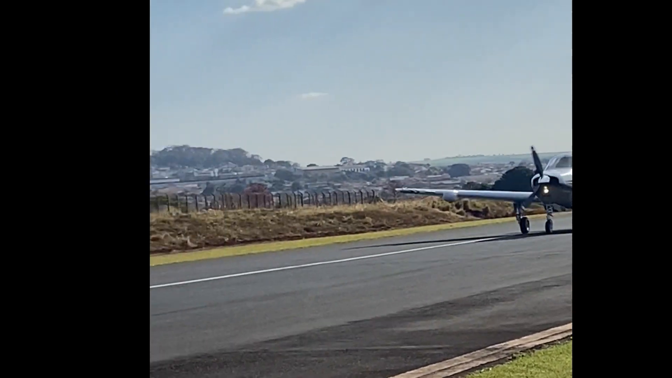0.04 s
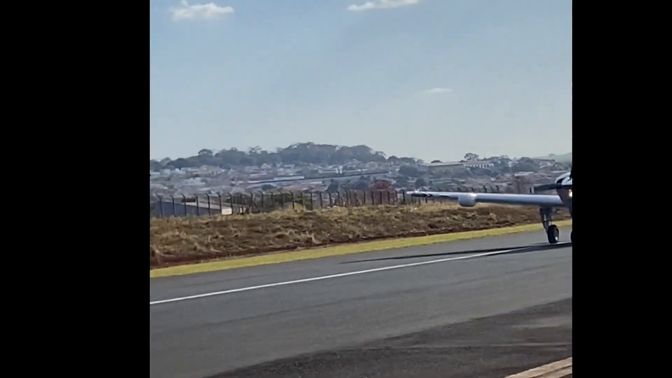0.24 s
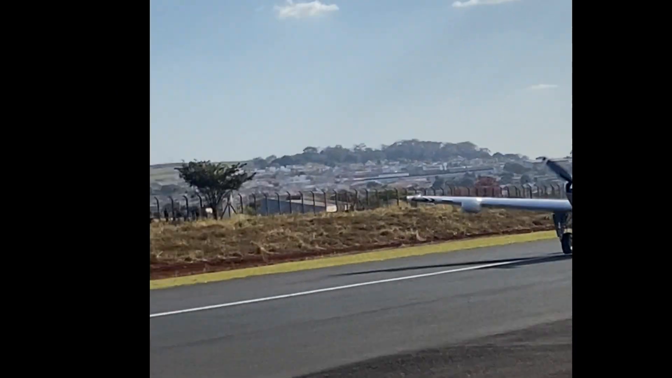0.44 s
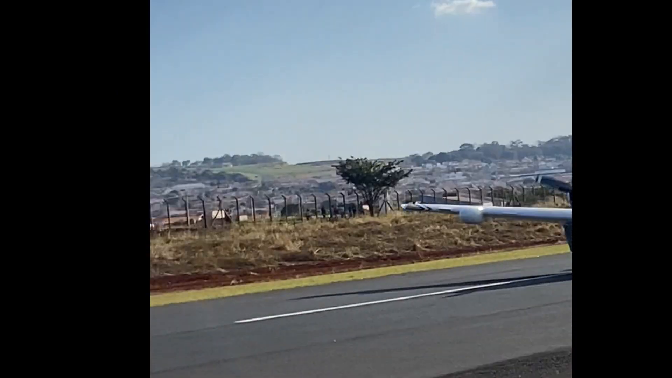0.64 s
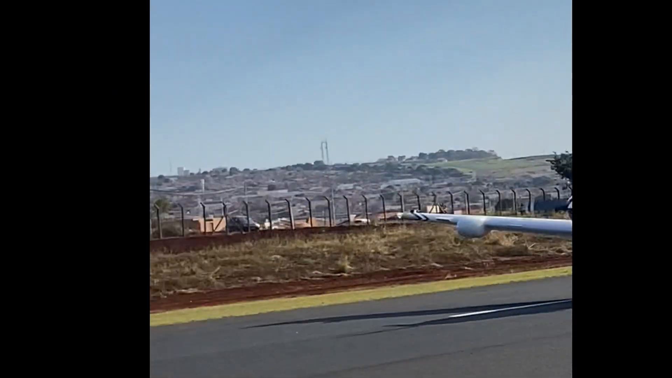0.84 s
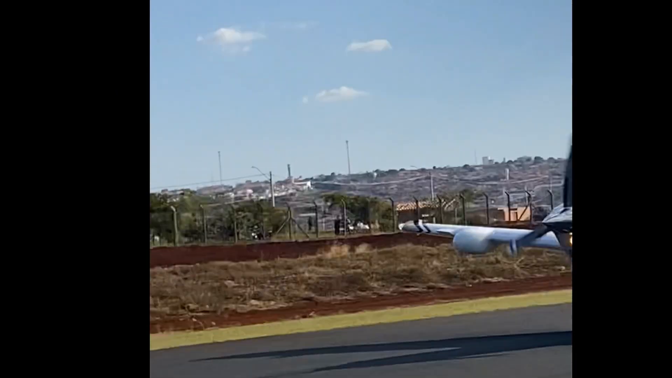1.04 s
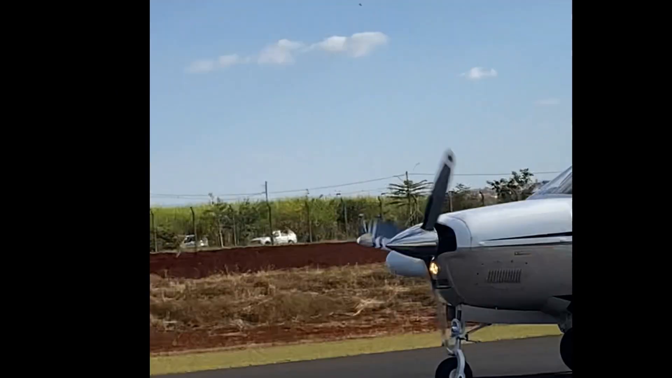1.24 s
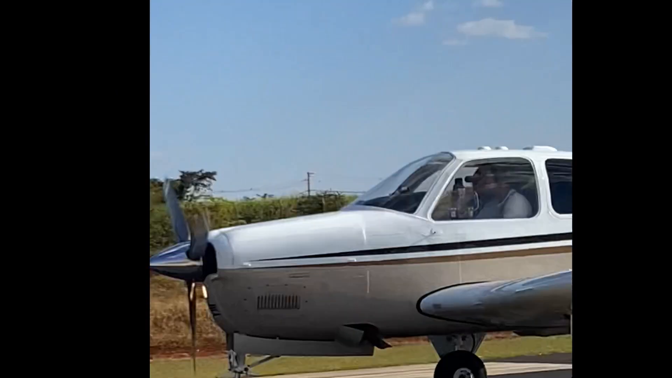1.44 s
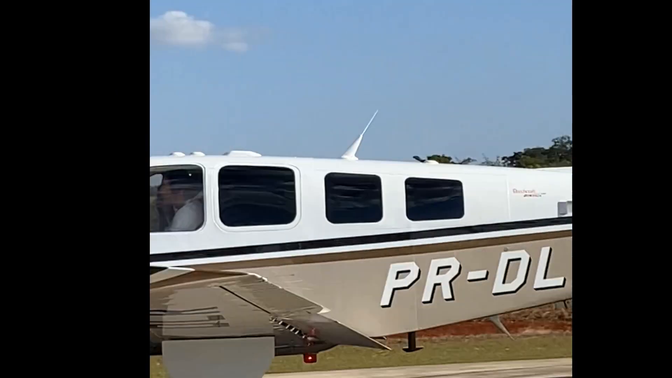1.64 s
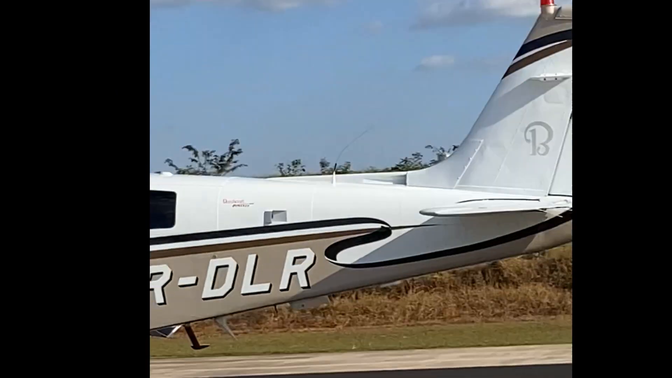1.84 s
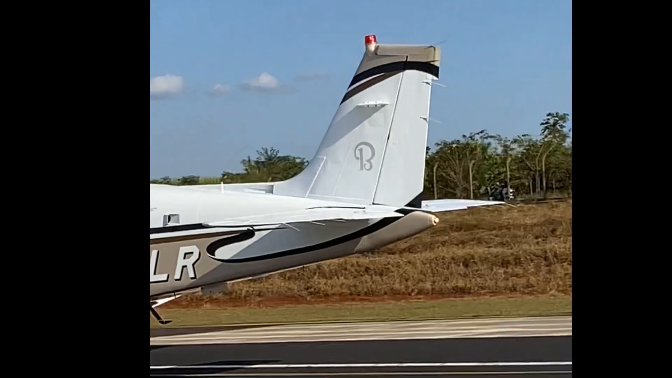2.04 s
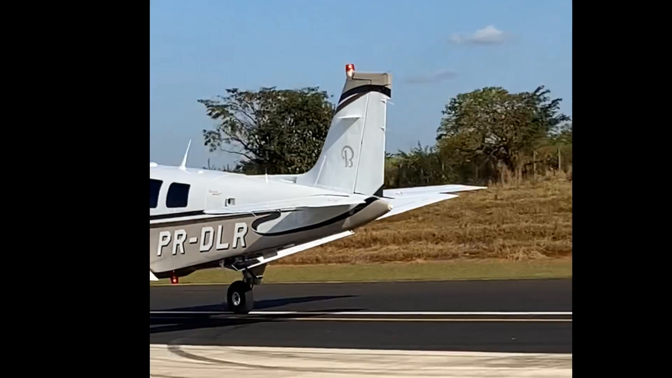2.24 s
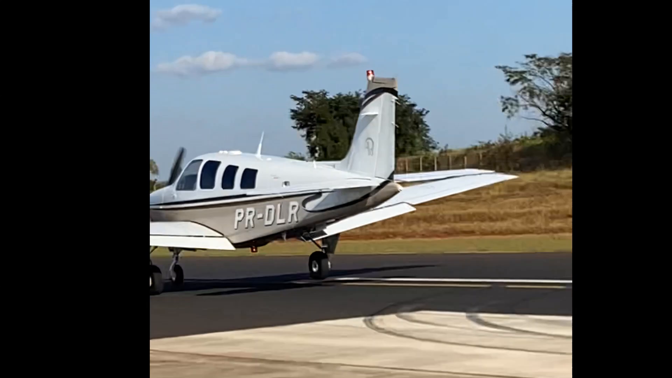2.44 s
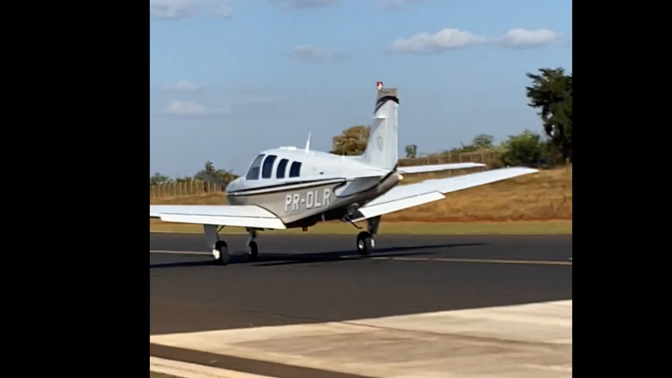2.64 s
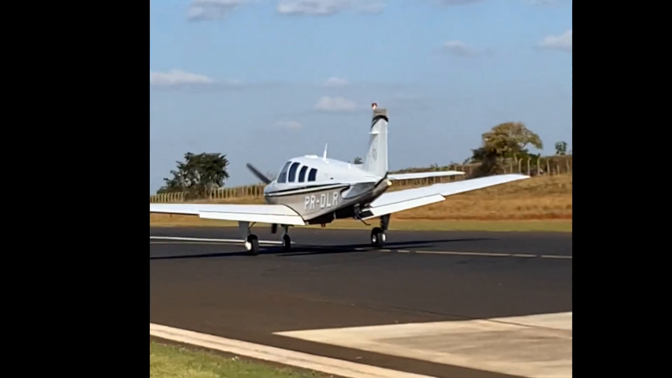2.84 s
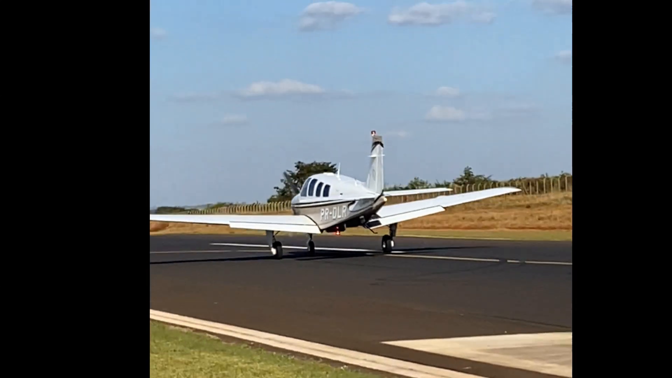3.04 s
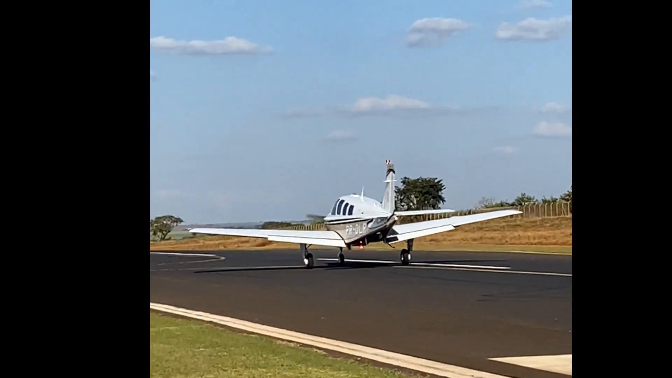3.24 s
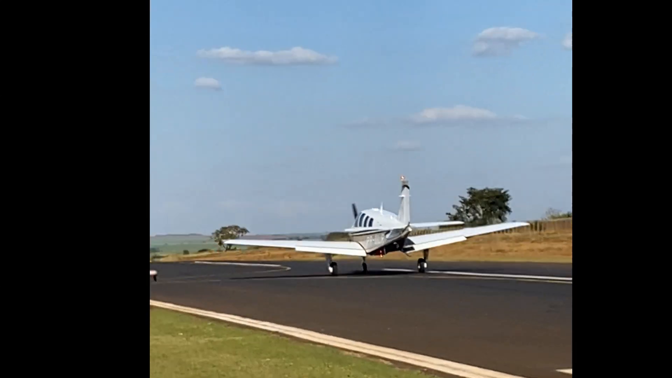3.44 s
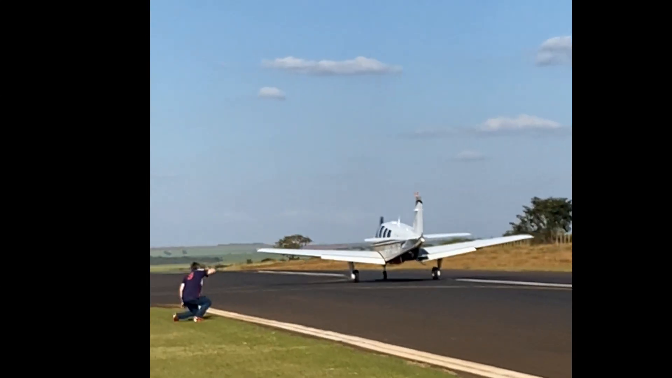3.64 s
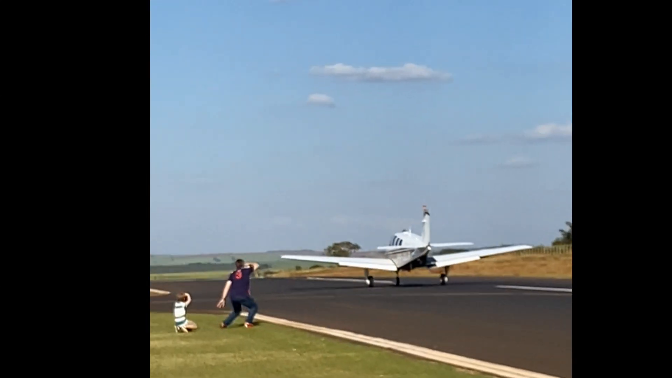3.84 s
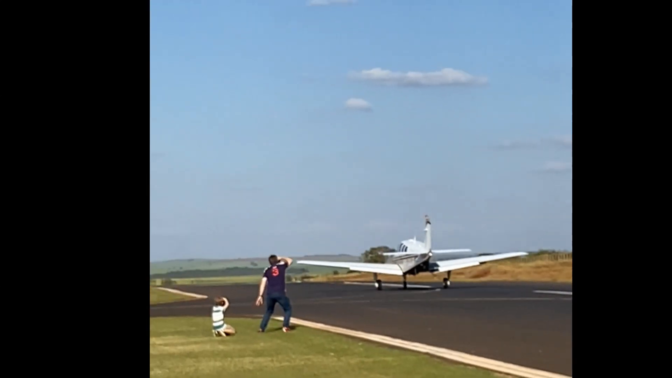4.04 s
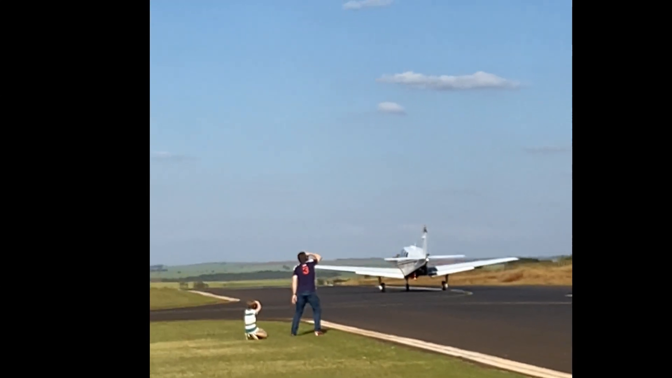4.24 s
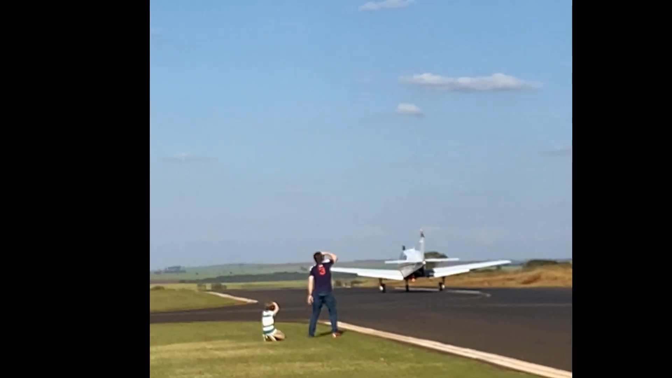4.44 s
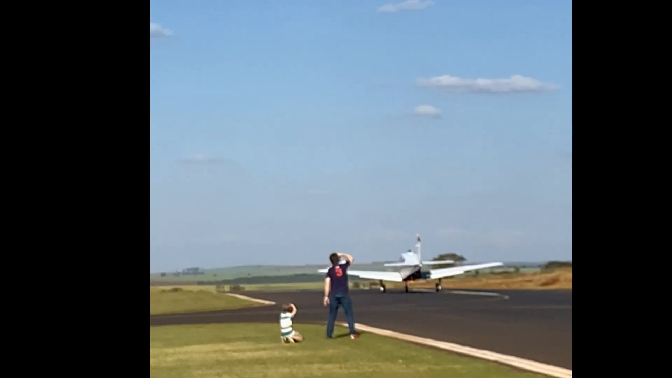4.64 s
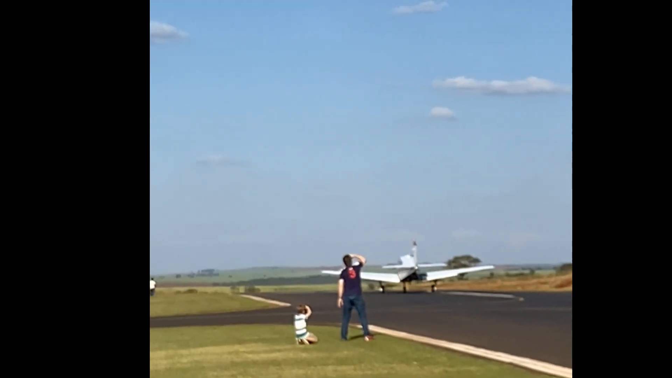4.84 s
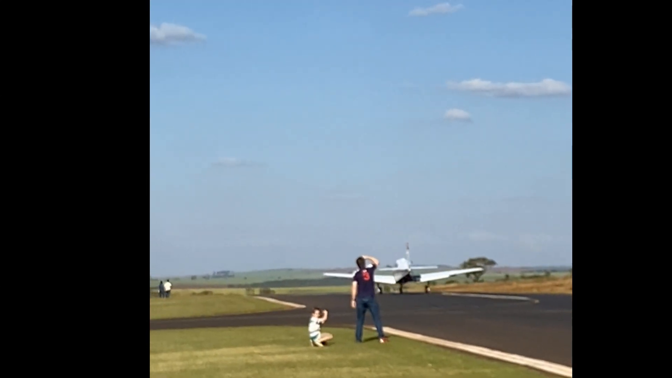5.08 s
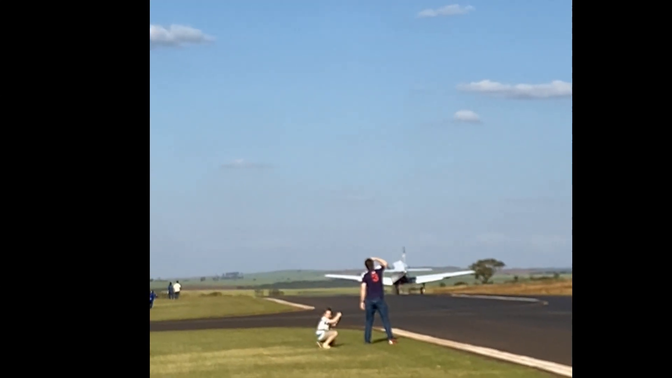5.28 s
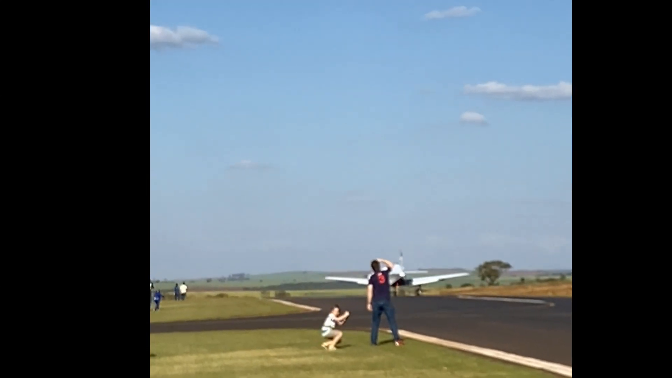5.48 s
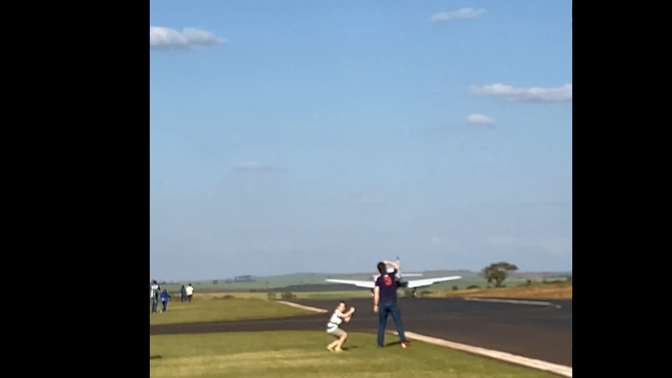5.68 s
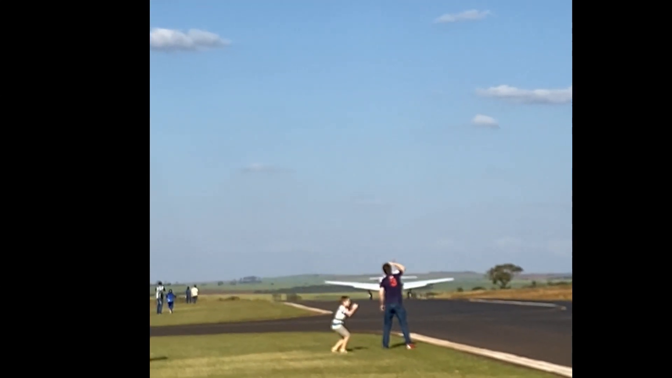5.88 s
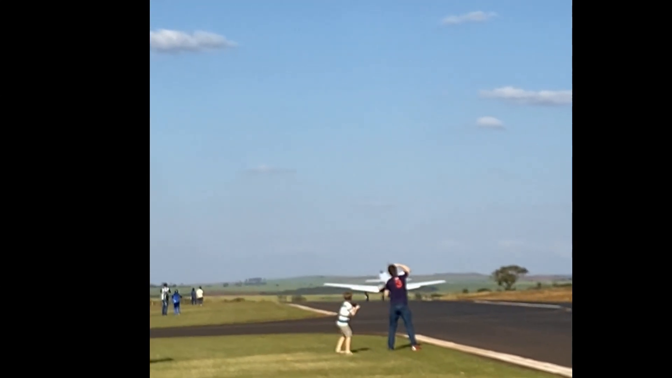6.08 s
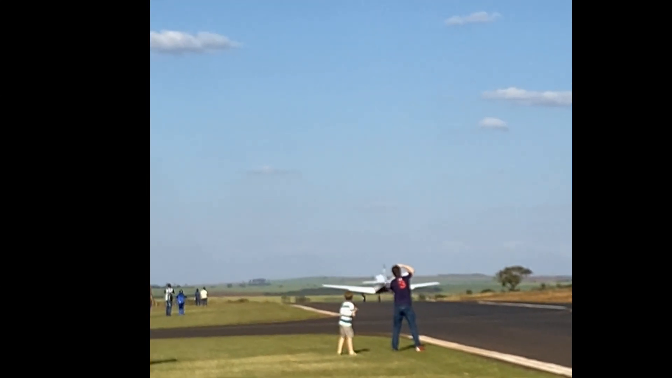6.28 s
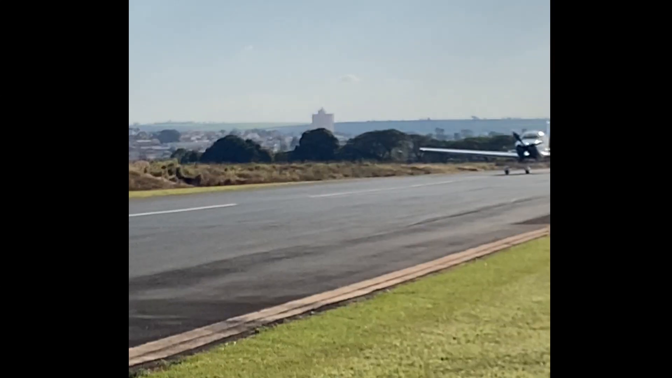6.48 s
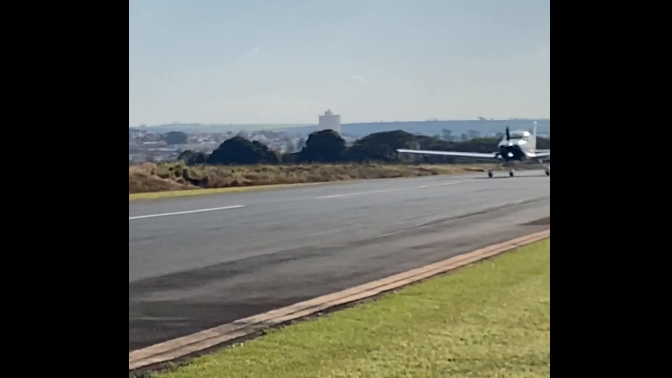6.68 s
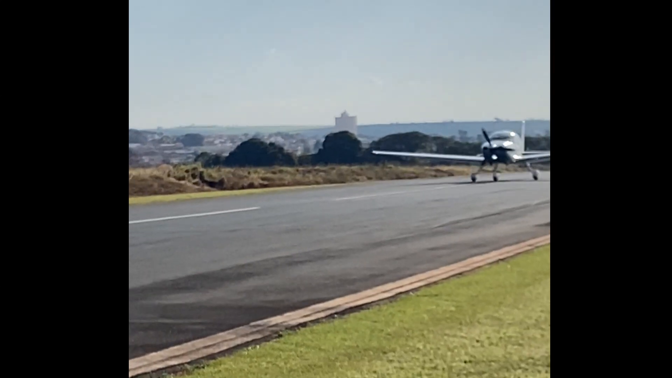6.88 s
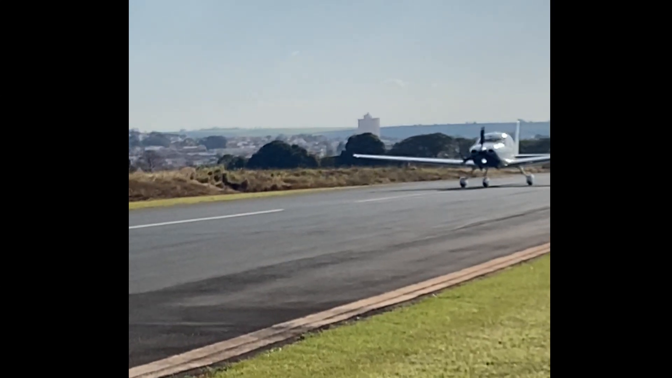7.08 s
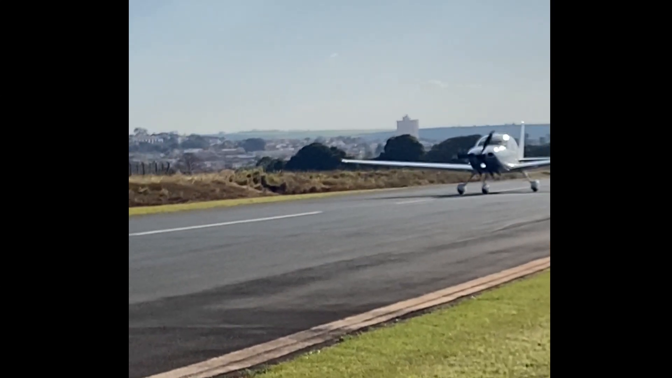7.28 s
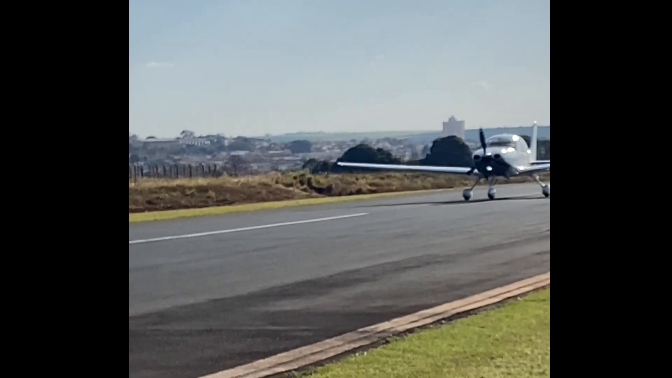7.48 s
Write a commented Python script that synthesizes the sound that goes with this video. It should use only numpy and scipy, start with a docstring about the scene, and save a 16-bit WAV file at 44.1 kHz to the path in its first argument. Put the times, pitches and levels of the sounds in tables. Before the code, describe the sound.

Outdoors at a small airfield, heard from beside the runway through a compact stereo microphone. From 0 s a single-engine propeller plane is already loud and coming closer at take-off power, a hard buzzing tone wrapped in broad, rapidly chopped air roar, with a lower engine drone nearby. Around 1.5-1.9 s it passes very close: the pitch slides clearly downward, the rush dips briefly and the propeller edge rasps. From 2.1 to 3.1 s the exhaust barks and crackles in rough bursts, swelling as the tail turns towards the listener, then the plane recedes and fades. The other engine revs up near 2 s and drones steadily, buzzing slightly, until it throttles back around 5.5 s over distant field rumble. At 6.44 s an abrupt cut leaves a split second of near-silence; from 6.49 s another propeller plane approaches, humming and nasal, growing steadily louder until the end at about 7.7 s.

```python
"""A single-engine plane rolls past at take-off power: blade and exhaust harmonics over chopped turbulent noise,
gliding down in pitch by the Doppler effect. Its tailpipes bark and crackle as resonators as it draws away.
A second engine drones nearby as a pulse series, opens up and throttles back, over distant field noise.
After an abrupt cut and near-silence another plane approaches from far off, its harmonics and noise growing.
All is heard through two closely spaced microphone ports, as frequency-dependent phase and level differences."""
import sys
import numpy as np
from scipy import signal
from scipy.fft import rfft, irfft, next_fast_len
from scipy.io import wavfile
from scipy.ndimage import map_coordinates

SR = 44100
rng = np.random.default_rng(int(sys.argv[2]) if len(sys.argv) > 2 else 0)


def to_wav(sig):
    """Store sig (one row per channel, or 1-D mono) as 16-bit WAV at the path in sys.argv[1].

    Samples outside -1..1 are clipped; the rate is SR.
    """
    pcm = np.clip(np.atleast_2d(sig), -1, 1) * 32767
    pcm = np.round(pcm).astype(np.int16)
    wavfile.write(sys.argv[1], SR, pcm.T)  # frames by channels


N = 331632

# Harmonic levels are relative: each series is later scaled to rms 1.
# Lower buzz of the propeller. Each row: multiple of blade rate, level in dB.
BUZZ = [(4, 5), (5, 5), (6, 5.5)]
# Bright edge of the buzz, thrown sideways from the blade tips. Each row: multiple of blade rate, level in dB.
EDGE = [(7, -2), (8, -4.5), (9, -7), (10, -10), (11, -17), (12, -22.5), (13, -28), (14, -25.5), (15, -26.5),
        (16, -32)]
# Exhaust of unequal cylinders. Each row: multiple of shaft rate, level in dB.
EXHAUST = [(1.5, 5), (2, -5), (2.5, -23), (3.5, -18), (4, -1.5), (4.5, 8.5), (5, -6), (6.5, -5), (7.5, 9),
           (8.5, -5), (9.5, -7.5)]
# Upper growl of the exhaust, heard from ahead. Each row: multiple of shaft rate, level in dB.
GROWL = [(10.5, -1.5), (11.5, -2.5), (12.5, -11.5), (13.5, -3), (14.5, -0.5), (16.5, -3.5), (17.5, -11)]
# How each part of the passing plane carries. Each row: level abeam in dB, dB gained straight ahead and lost
# straight behind, dB lost per doubling of distance on the way in, the same on the way out, dB of tail swell.
PASS_PARTS = {"blade tone": (-12.5, 7, 5, 5.5, 5), "second harmonic": (-14, 7.5, 10, 15.5, 17),
              "third harmonic": (-16, 12.5, 21, 12, 11.5), "buzz": (-19, 11, 12.5, 12, 8),
              "edge": (-26, 12, 17.5, 10, 9), "exhaust": (-16.5, 11, 12.5, 9.5, 9.5),
              "growl": (-36.5, 12.5, 2, 7, 11.5), "wash": (2.05, 3.8, 1.6, 10.7, 4.9),
              "rasp": (-8, 9, 1.33, 7, 6.5), "hiss": (-14.5, 3.5, -2, 17.5, 8)}
# Level changes of single parts: dips and flares around abeam, and late rises near the cut, blending with the
# drone's harmonics. Each row: part, centre in seconds, half width in seconds, change in dB.
PASS_ACCENTS = [("blade tone", 1.55, 0.16, -13.5), ("second harmonic", 1.525, 0.04, -16),
                ("third harmonic", 1.46, 0.37, -5.5), ("third harmonic", 1.87, 0.14, 2),
                ("buzz", 1.9, 0.089, 1.7), ("edge", 1.65, 0.28, 4.8), ("exhaust", 1.63, 0.45, -8),
                ("exhaust", 2.07, 0.23, 2.1), ("wash", 1.83, 0.41, -12.5), ("rasp", 1.44, 0.54, -6),
                ("hiss", 1.72, 0.47, -10), ("rasp", 0.92, 0.2, 1.5), ("rasp", 1.84, 0.076, 4.6),
                ("wash", 2.13, 0.17, 3.5), ("third harmonic", 6.14, 0.44, 17.2), ("buzz", 7.5, .55, 7),
                ("hiss", 6.3, .13, 8)]
# Air rush of the passing plane. Each row: frequency in Hz, density in dB per Hz before the register levels.
PASS_AIR = [(30, -63), (60, -56.5), (130, -49.5), (280, -53), (450, -57), (800, -55), (1300, -57),
            (1800, -58), (2400, -60.5), (3600, -64.5), (5600, -64), (9000, -60.5), (13400, -65.5),
            (16000, -72)]
# Exhaust roar repeats with every engine cycle, air turbulence does not.
# Each row: frequency in Hz, share of the rush's power that repeats (0 to 1).
PASS_REPEATS = [(200, 0.23), (600, 0.35), (1500, 0.33), (3000, 0.12), (6000, 0.036)]
# Abeam the blades chop the wash harder. The row: half width in seconds, extra depth in dB.
ABEAM_SLAP = (.4, 4)
# The sound swells when the tail turns to the listener. The row: attack, hold and release in seconds.
TAIL_SWELL = (0.12, 0.63, 0.7)
# Burst of crackle as that swell starts. The row: attack, hold and release in seconds.
CRACKLE_BURST = (0.05, 0.24, 0.9)
# Tailpipe resonances. Each row: centre in Hz, width in Hz, relative level in dB.
TAILPIPES = [(864, 140, -4), (1410, 500, 1.5), (1740, 210, 9.5)]
# Hard firings of the near cylinder bank bark out. Each row: time in seconds, peak of the ring in dB, ring in Hz.
BARKS = [(2.1298, -26, 1240), (2.1718, -27, 1630), (2.1881, -24, 1340), (2.2014, -24, 1440),
         (2.2343, -24, 1360), (2.2507, -25, 1370), (2.2663, -26, 1450), (2.2818, -22, 1440),
         (2.3119, -29, 1700), (2.3371, -26, 1380), (2.3844, -29, 1420), (2.4254, -28, 1570),
         (2.5375, -29, 1260), (2.6481, -28, 1630), (2.6651, -21, 1330), (2.6973, -28, 1530),
         (2.7138, -22, 1410), (2.7296, -26, 1340), (2.7454, -24, 1530), (2.7612, -25, 1340),
         (2.7763, -25, 1650), (2.7932, -26, 1700), (2.8100, -24, 1360), (2.8246, -25, 1710),
         (2.8421, -22, 1720), (2.8575, -25, 1430), (2.8728, -26, 1730), (2.9212, -27, 1690),
         (2.9383, -27, 1650), (3.0935, -29, 1710)]
# Bands of the roar that swell and fade.
# Each row: centre in seconds, half width in seconds, centre in Hz, width in Hz, peak in dB.
ROAR_SWELLS = [(0.45, 0.22, 1560, 280, -34), (0.85, .25, 412, 90, -31.5), (0.98, 0.41, 2060, 800, -31.5),
               (2.79, .1, 950, 450, -42.5), (3.25, .3, 815, 250, -47), (3.33, .15, 1740, 250, -55),
               (4.8, 0.44, 1760, 240, -50), (4.92, 0.19, 1226, 170, -48), (6.1, .25, 1720, 200, -53)]
# Note level of the droning engine. Each row: time in seconds, level in dB.
DRONE_DB = [(0.0, -15.5), (0.07, -10.5), (0.18, -13.5), (0.21, -12), (0.3, -11.5), (0.38, -16),
            (0.47, -11.5), (1.48, -21), (1.72, -27), (2.63, -23), (2.78, -18.5), (5.8, -18.5),
            (6.43, -19.5)]
# Its note. Each row: multiple of engine speed, relative level in dB.
DRONE_ORDERS = [(1.5, -31.5), (2, 1.5), (6, -27.5), (7, -46.5), (8, -40.5), (10, -48), (12, -42), (16, -41)]
# Its lope from uneven firing. Each row: multiple of engine speed, then dB against the note at first,
# with the throttle open, and throttled back.
DRONE_LOPE = [(1, -40.5, -19, -20), (3, -11, -15, -9), (4, -17.5, -16, -13.5), (5, -10, -17.5, -19)]
# The throttle opens, then closes. Each row: middle in seconds, easing time in seconds, change of speed in Hz.
THROTTLE = [(1.85, .5, 4.72), (5.47, .21, -5.0)]
# Metallic buzz of its firings, throttle open and throttled back. Each row: frequency in Hz, level in dB per line.
DRONE_BUZZ_OPEN = [(350, -89), (700, -66.5), (1000, -77.5), (1270, -62), (1450, -73), (1750, -66),
                   (2000, -70.5), (2240, -59), (2550, -71), (2800, -69.5), (4500, -83.5), (12000, -118)]
DRONE_BUZZ_BACK = [(250, -85.5), (370, -65.5), (460, -61.5), (550, -66.5), (830, -53), (1000, -75),
                   (1110, -60), (1470, -67), (1660, -54), (1850, -60), (2100, -66.5), (2600, -74.5),
                   (4500, -84.5), (12000, -118)]
# The open-throttle buzz flares once. The row: centre in seconds, half width in seconds, change in dB.
DRONE_FLARE = (4.22, 0.1, 4)
# Distant engine noise over the field. Each row: frequency in Hz, density in dB per Hz before the register levels.
FIELD_AIR = [(25, -78.5), (50, -53), (110, -59), (200, -73.5), (330, -77.5), (500, -81), (800, -75.5),
             (1200, -78), (1450, -80), (1750, -74), (2050, -79), (2600, -85), (4800, -94), (8000, -90),
             (11000, -108), (15000, -128)]
# Its register levels. Each row: dB at the start, dB at the cut, bow in dB at half way.
FIELD_RUSH = {"wash": (0, 3.4, -2), "rasp": (-14, 0.33, 6.9), "hiss": (0, 0.67, -8.5)}
# Hum to edge of the approaching plane. Each row: multiple of one bank's firing rate, relative level in dB.
NEXT_ORDERS = {"hum": [(1, -11), (2, 0.5), (3, -0.5), (4, 0)], "growl": [(5, -2), (6, -1.5)],
               "buzz": [(7, -9), (8, -7.5), (9, 1.5)], "twang": [(10, -9), (11, 2), (12, -10), (13, -6)],
               "edge": [(14, -3), (15, 1.5), (16, -9.5), (17, -12), (18, -18), (19, -5.5), (20, -6.5),
               (22, -11)]}
# Their growth as it nears. Each row: dB at first, dB at the end, bow in dB at half way.
NEXT_TONES = {"hum": (-31, -16, -4.5), "growl": (-31.5, -26.5, 0), "buzz": (-32, -23, 3.3),
              "twang": (-38, -27, 7.4), "edge": (-38.5, -28, 1.7)}
# Firing rate of one bank. The row: Hz at first, Hz at the end, bow in Hz at half way.
NEXT_BANK_HZ = (73.9, 74.65, -.33)
# Its air rush. Each row: frequency in Hz, density in dB per Hz before the register levels.
NEXT_AIR = [(30, -77), (60, -48), (130, -53), (350, -56), (500, -60), (800, -58.5), (1400, -66.5),
            (2100, -76), (3600, -85.5), (6000, -84.5), (9000, -89), (13400, -112)]
# Its register levels. Each row: dB at first, dB at the end, bow in dB at half way.
NEXT_RUSH = {"wash": (-1.4, 0.48, 0.22), "rasp": (-2.3, 9.1, -1.5), "hiss": (-17, 4.2, 0)}
# Its roar repeating with the engine cycle. Each row: frequency in Hz, share of power that repeats (0 to 1).
NEXT_REPEATS = [(150, 0.034), (400, 0.34), (900, 0.59), (1500, 0.46), (3000, 0.23), (6000, .1)]
# Its roar climbs in pitch as it nears.
# Each row: centre in seconds, half width in seconds, centre in Hz, width in Hz, peak in dB.
NEXT_SWELLS = [(6.63, .12, 402, 120, -33.5), (7.08, 0.22, 860, 280, -30.5), (7.24, 0.24, 1340, 500, -35),
               (7.45, .13, 4200, 2400, -48)]
# Centres in Hz of the noise registers wash, rasp and hiss.
RUSH_HZ = [746, 3020, 7340]
# Phase between the microphone ports. Each row: frequency in Hz, radians by which the left leads.
PORT_PHASE = [(20, 0), (300, -.08), (600, -.4), (900, -.62), (1400, -.1), (2500, .65), (3300, .1),
              (4480, .75), (5080, .05), (6000, 1.3), (7250, 3.14), (10000, 6.2), (11000, 6.4), (13400, 9.4),
              (16000, 12.4)]
# Level between the ports, for runway and field. Each row: frequency in Hz, left over right in dB.
RUNWAY_BALANCE = [(60, -1), (380, 3), (540, -6), (720, 0), (1250, -5), (1900, -0.5), (3200, -1),
                  (9000, -0.6)]
FIELD_BALANCE = [(60, -0.5), (170, 1.7), (350, 5.5), (650, 0.5), (1250, -1.5), (1800, 13), (2700, -2),
                 (9000, 0)]
# Likeness of the noise at the ports, for runway and field. Each row: frequency in Hz, correlation (0 to 1).
RUNWAY_LIKENESS = [(200, 0.91), (1000, 0.79), (3000, 0.94), (6000, 0.94), (14000, 0.87)]
FIELD_LIKENESS = [(150, 0.94), (500, 0.076), (2000, 0.56), (9000, 0.89)]

# passing plane: blade rate at the source (three blades and three firings per shaft turn), and its straight run
BLADE_HZ, SPEED_M_PER_S, MISS_M, ABEAM_S, SOUND_M_PER_S = 135.17, 33.6, 14.5, 1.744, 343
TAIL_S = 2.655  # the tail turns to the listener
# behind the plane the edge turns ragged: its spread, and the time to get there
RAGGED_DB, RAGGED_ONSET_S = 3.5, 0.3
# decay of a pop; steady crackle and the rise of its burst
POP_S, CRACKLE_STEADY_DB, CRACKLE_BURST_DB = 0.0008, -62, 18.5
# a bark's rise, and its gas noise: band, level against the ring
BARK_RISE_S, BARK_SPIT_HZ, BARK_SPIT_DB = 0.001, (700, 2400), -11
DRONE_IDLE_HZ = 46.15  # speed before the throttle opens
CUT_S, RESUME_S, CUTOFF_HZ = 6.442, 6.490, 15850

TIME = np.arange(N) / SR
SIZE = next_fast_len(N + 4096, real=True)
BINS = np.arange(SIZE // 2 + 1) * SR / SIZE


def from_db(db):
    """Amplitude ratio is ten to the power of decibels over twenty."""
    return 10 ** (np.asarray(db) / 20)


def at_bins(points):
    """Spectral curves are joined linearly on a logarithmic frequency axis."""
    hz, value = np.transpose(points)
    return np.interp(np.log(BINS + 1), np.log(hz), value)


def to_time(spectrum):
    """The inverse Fourier transform returns a spectrum to samples."""
    return irfft(spectrum, SIZE)[..., :N]


def bump(s, width_s, change_db):
    """A Gaussian in time gives a smooth, brief change of level (dB)."""
    return change_db * np.exp(-((TIME - s) / width_s) ** 2)


def arc(start_s, end_s, first, last, bow):
    """A straight ramp plus a parabola bows gently from one value to another."""
    part = np.clip((TIME - start_s) / (end_s - start_s), 0, 1)
    return first + (last - first) * part + bow * (1 - (2 * part - 1) ** 2)


def drift(rate):
    """Low-passed random noise of spread 1 wanders about rate times a second."""
    step = 40  # samples between computed values
    r = np.exp(-80 * np.pi * rate / SR)
    noise = rng.standard_normal(N // step + 2002)
    slow = signal.lfilter([1], [1, -2 * r, r * r], noise)[2000:]  # settled part
    return np.interp(np.arange(N) / step, np.arange(len(slow)), slow / slow.std())


def turns(hz, wobble):
    """Phase is the integral of frequency: cycles run through by a slightly unsteady engine."""
    return np.cumsum(hz * (1 + wobble * drift(8.2))) / SR


def partials(cycles, orders, flutter_db, flutter_rate, smear, stagger=0):
    """Fourier series of a pulse, rms 1: lows trail highs, and turbulent air shakes each line."""
    out = np.zeros(N)
    shake = flutter_db * np.log(10) / 20  # radians matching the level flutter
    for order, db in orders:
        order = np.round(2 * order) / 2
        # holding back the odd orders splits each pulse into two of unlike shape
        lag = smear * np.log(order) + stagger * (order % 2)
        phase = 2 * np.pi * (order * cycles - lag)
        gain = from_db(db + flutter_db * drift(flutter_rate))
        out += gain * np.cos(phase + shake * drift(flutter_rate))
    return out / out.std()


def firings(cycles, rough_db):
    """A pulse train: one click per cycle, each with its own strength."""
    fires = np.diff(np.floor(cycles), prepend=0) > 0
    return fires * from_db(rough_db * np.clip(rng.standard_normal(N), -2, 2))


def chop(cycles, depth_db, rough_db):
    """Amplitude modulation once per cycle, by an uneven amount; rms 1."""
    gain = from_db(depth_db * np.cos(2 * np.pi * cycles) + rough_db * drift(71))
    return gain / np.sqrt(np.mean(gain ** 2))


def looped(cycles, size=1780, count=66, order=3):
    """Periodic noise comes round with every engine cycle; low down it leaves out every third line."""
    lines = rfft(rng.standard_normal(size))
    lines[:count + 1:order] = 0  # the strong lines stand here
    loop = irfft(lines, size)
    # the factor makes up for the lines removed at the low end, and lifts the rest equally
    return map_coordinates(loop, [cycles % 1 * size], order=1, mode="grid-wrap") * np.sqrt(3 / 2)


def ports(spectrum, balance):
    """Two spaced ports hear a sound with frequency-dependent phase and level differences."""
    half = from_db(at_bins(balance) / 2) * np.exp(1j * at_bins(PORT_PHASE) / 2)
    pair = np.array([half, 1 / half])
    power = np.mean(abs(pair) ** 2, axis=0)
    return to_time(spectrum * pair / np.sqrt(power))


def rush(air, levels, balance, likeness, engine=None, repeats=None):
    """Filtered, partly correlated noise in three overlapping registers (wash, rasp, hiss), each at its level (dB).

    Given an engine's cycles, a share of the noise repeats with them."""
    alike, registers = np.clip(at_bins(likeness), 0, 1), []
    shares = np.array([at_bins(list(zip(RUSH_HZ, row))) for row in np.eye(len(RUSH_HZ))])
    shares = shares / np.linalg.norm(shares, axis=0)  # powers add up to one
    colours = from_db(at_bins(air)) * np.sqrt(SR / 2) * shares
    for colour, level_db in zip(colours, levels):
        mid, side = rfft(rng.standard_normal((2, SIZE)))
        if repeats:
            locked = np.clip(at_bins(repeats), 0, 1)
            mid = np.sqrt(1 - locked) * mid + np.sqrt(locked) * rfft(looped(engine), SIZE)
        pair = np.sqrt((1 + alike) / 2) * mid + np.sqrt((1 - alike) / 2) * side * [[1], [-1]]
        registers.append(from_db(level_db) * ports(colour * pair, balance))
    return registers


def field(blade, drone):
    """Amplitude-modulated noise: far rumble and rasp pulse with the droning engine, the rasp with the propeller too."""
    levels_db = [arc(0, CUT_S, *row) for row in FIELD_RUSH.values()]
    wash, rasp, hiss = rush(FIELD_AIR, levels_db, FIELD_BALANCE, FIELD_LIKENESS)
    throb = chop(drone, depth_db=1.0, rough_db=1.7)
    pulsing = (wash + rasp * chop(blade, depth_db=2.0, rough_db=1.5)) * throb
    return pulsing + hiss * from_db(1.3 * drift(12.0))


def drone_buzz(cycles, hz, colour, smear=2.5):
    """A dispersive filter: two firings per turn rattle the exhaust, lows trail highs, and the breeze sways the level."""
    # scaled so that the colour sets the level of each line
    clicks = firings(2 * cycles, rough_db=2.0) * SR / (2 * hz * np.sqrt(2))
    pipe = from_db(at_bins(colour)) * np.exp(-2j * np.pi * smear * np.log(BINS + 1))
    return to_time(rfft(clicks, SIZE) * pipe) * from_db(1.0 * drift(2.3))


def droning_engine():
    """Harmonic synthesis of a dull exhaust note and faint buzz; the throttle sets speed, lope and buzz colour."""
    moves = [1 / (1 + np.exp((s - TIME) / ease_s)) for s, ease_s, _ in THROTTLE]
    opened, closed = moves
    hz = DRONE_IDLE_HZ + sum(move * change_hz for move, (_, _, change_hz) in zip(moves, THROTTLE))
    cycles = turns(hz, wobble=0.0005)
    note = partials(cycles, DRONE_ORDERS, flutter_db=0.0, flutter_rate=2.3, smear=0.745)
    for order, first_db, open_db, back_db in DRONE_LOPE:
        db = first_db + (open_db - first_db) * opened + (back_db - open_db) * closed
        lope = partials(cycles, [(order, 0)], flutter_db=1.0, flutter_rate=14.0, smear=0.704)
        note += from_db(db) * lope
    flare = from_db(bump(*DRONE_FLARE))
    buzz = (opened - closed) * flare * drone_buzz(cycles, hz, DRONE_BUZZ_OPEN)
    buzz += closed * drone_buzz(cycles, hz, DRONE_BUZZ_BACK)
    level_db = np.interp(TIME, *np.transpose(DRONE_DB))
    return ports(rfft(from_db(level_db) * note + buzz, SIZE), FIELD_BALANCE), cycles


def roar_swells(swells, cycles):
    """Band-passed noise: narrow, whistly bands of the roar come and go, pulsing with the engine."""
    out = np.zeros(N)
    for s, width_s, hz, width_hz, db in swells:
        edges_hz = [hz - width_hz / 2, hz + width_hz / 2]
        narrow = signal.butter(2, edges_hz, "band", fs=SR, output="sos")
        noise = signal.sosfilt(narrow, rng.standard_normal(N))
        out += from_db(db) * bump(s, width_s, 1) * noise / noise.std()  # the bump serves as a gain here
    return ports(rfft(out * chop(cycles, depth_db=2.5, rough_db=1.6), SIZE), RUNWAY_BALANCE)


def approaching_plane():
    """Staggered pulse series: two banks of three cylinders fire in turn, a distant engine with a nasal buzz."""
    hz = arc(RESUME_S, N / SR, *NEXT_BANK_HZ)
    air_db = [arc(RESUME_S, N / SR, *row) for row in NEXT_RUSH.values()]
    bank = turns(hz, wobble=0.0006)
    tones = np.zeros(N)
    for part, orders in NEXT_ORDERS.items():
        lines = partials(bank, orders, flutter_db=1.3, flutter_rate=7, smear=0.794, stagger=0.31)
        tones += from_db(arc(RESUME_S, N / SR, *NEXT_TONES[part])) * lines
    engine = bank / 3  # three firings of a bank per engine cycle
    wash, rasp, hiss = rush(NEXT_AIR, air_db, RUNWAY_BALANCE, RUNWAY_LIKENESS, engine, NEXT_REPEATS)
    air = wash * chop(2 * bank, depth_db=0.5, rough_db=1.6)
    air += (rasp + hiss) * chop(2 * bank, depth_db=0.5, rough_db=0.5)
    return ports(rfft(tones, SIZE), RUNWAY_BALANCE) + air + roar_swells(NEXT_SWELLS, 2 * bank)


def tail_swell(attack_s, hold_s, release_s):
    """A linear envelope from 0 to 1 and back, from the moment the tail faces the listener."""
    since = TIME - TAIL_S
    rise = since / attack_s
    fall = 1 - (since - attack_s - hold_s) / release_s
    return np.clip(np.minimum(rise, fall), 0, 1)


def exhaust_crackle(blade):
    """Resonance excited by pulses: each firing pops and rings the pipes, bursting out as the tail faces the listener."""
    pops = firings(blade, rough_db=2.2)
    decay = np.exp(-1 / (POP_S * SR))
    puffs = signal.lfilter([1], [1, -decay], pops + 1e-18) * rng.standard_normal(N)
    rung = np.zeros(N)
    for hz, width, db in TAILPIPES:
        pipe = signal.butter(3, [hz - width / 2, hz + width / 2], "band", fs=SR, output="sos")
        rung += from_db(db) * signal.sosfilt(pipe, puffs)
    level_db = CRACKLE_STEADY_DB + CRACKLE_BURST_DB * tail_swell(*CRACKLE_BURST)
    return ports(rfft(from_db(level_db) * rung / rung.std(), SIZE), RUNWAY_BALANCE)


def exhaust_barks():
    """A damped ring: each hard firing sounds the tailpipe briefly with a spit of gas noise."""
    out, since = np.zeros(N), np.arange(600) / SR
    envelope = (since / BARK_RISE_S * np.exp(1 - since / BARK_RISE_S)) ** 2
    gas = signal.butter(4, BARK_SPIT_HZ, "band", fs=SR, output="sos")
    for s, db, hz in BARKS:
        spit = signal.sosfilt(gas, rng.standard_normal(len(since)))
        start = int((s - BARK_RISE_S) * SR)
        sound = np.sin(2 * np.pi * hz * since) + from_db(BARK_SPIT_DB) * spit / spit.std()
        out[start:start + len(since)] += from_db(db) * envelope * sound
    return ports(rfft(out, SIZE), RUNWAY_BALANCE)


def fly_by():
    """Doppler effect, directivity and spreading give the blade rate (Hz) and each part's level (dB)."""
    to_go = SPEED_M_PER_S * (ABEAM_S - TIME)
    distance = np.hypot(to_go, MISS_M)
    facing = to_go / distance  # 1 straight ahead of the plane, -1 straight behind
    doublings = np.log2(distance / MISS_M)
    swell, levels = tail_swell(*TAIL_SWELL), {}
    for part, (abeam_db, ahead_db, in_db, out_db, swell_db) in PASS_PARTS.items():
        spreading_db = np.where(to_go > 0, in_db, out_db) * doublings
        levels[part] = abeam_db + ahead_db * facing - spreading_db + swell_db * swell
    for part, s, width_s, change_db in PASS_ACCENTS:
        levels[part] = levels[part] + bump(s, width_s, change_db)
    return BLADE_HZ / (1 - facing * SPEED_M_PER_S / SOUND_M_PER_S), levels


def passing_plane():
    """Rotating-source harmonics: blade tones, exhaust orders and chopped air follow one Doppler-shifted shaft."""
    hz, level = fly_by()
    blade = turns(hz, wobble=0.00068)
    shaft = blade / 3
    smear = 0.827
    tones = np.zeros(N)
    for order, part in enumerate(["blade tone", "second harmonic", "third harmonic"], start=1):
        line = partials(blade, [(order, 0)], flutter_db=0.77, flutter_rate=6.5, smear=smear)
        tones += from_db(level[part]) * line
    buzz = partials(blade, BUZZ, flutter_db=0.8, flutter_rate=14, smear=smear)
    tones += from_db(level["buzz"]) * buzz
    ragged_db = RAGGED_DB * np.clip((TIME - ABEAM_S) / RAGGED_ONSET_S, 0, 1) * drift(70)
    edge = partials(blade, EDGE, flutter_db=0.8, flutter_rate=14, smear=smear)
    tones += from_db(level["edge"] + ragged_db) * edge
    exhaust = partials(shaft, EXHAUST, flutter_db=2.8, flutter_rate=1.8, smear=3.1)
    tones += from_db(level["exhaust"]) * exhaust
    growl = partials(shaft, GROWL, flutter_db=1.5, flutter_rate=5, smear=3.1)
    tones += from_db(level["growl"]) * growl

    air_db = [level["wash"], level["rasp"], level["hiss"]]
    engine = shaft / 2  # two shaft turns per engine cycle
    wash, rasp, hiss = rush(PASS_AIR, air_db, RUNWAY_BALANCE, RUNWAY_LIKENESS, engine, PASS_REPEATS)
    slap_db = bump(ABEAM_S, *ABEAM_SLAP)
    air = wash * chop(blade, depth_db=0.5 + slap_db, rough_db=1.7)
    air += rasp * chop(blade, depth_db=1.1, rough_db=1.7)
    air += hiss * chop(blade, depth_db=0.6, rough_db=1.0)
    return ports(rfft(tones, SIZE), RUNWAY_BALANCE) + air, blade


def scene():
    """Superposition of sources: two passes with a moment of near-silence between them."""
    plane, blade = passing_plane()
    hum, drone = droning_engine()
    first = plane + roar_swells(ROAR_SWELLS, blade) + exhaust_crackle(blade) + exhaust_barks()
    first += hum + field(blade, drone)
    second = approaching_plane() * np.clip((TIME - RESUME_S) / 0.003, 0, 1)
    floor = from_db(-90) * rng.standard_normal((2, N))
    return first * (TIME < CUT_S) + second + floor


def record(dry):
    """Band limiting and soft saturation: the microphone drops the deepest bass, peaks round off, the top is cut."""
    thin = signal.sosfilt(signal.butter(4, 43, "high", fs=SR, output="sos"), dry)
    held = thin / (1 + thin ** 8) ** (1 / 8)
    return signal.sosfilt(signal.ellip(12, 0.1, 90, CUTOFF_HZ, fs=SR, output="sos"), held)


dry = scene()
out = record(dry)
to_wav(out)
```